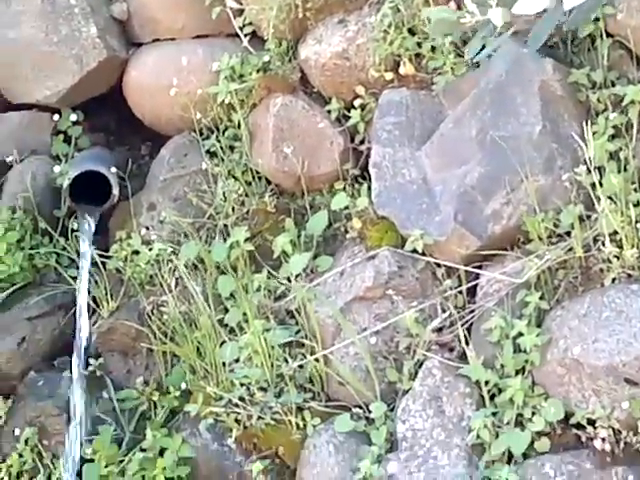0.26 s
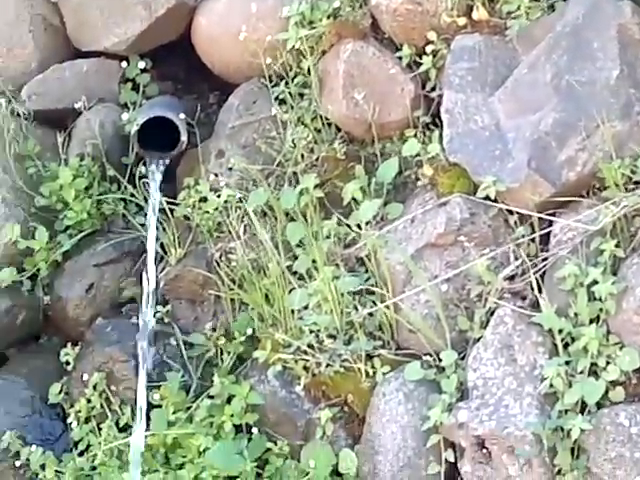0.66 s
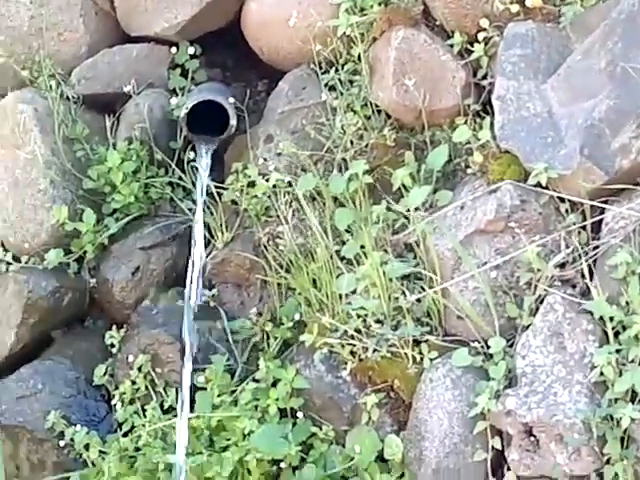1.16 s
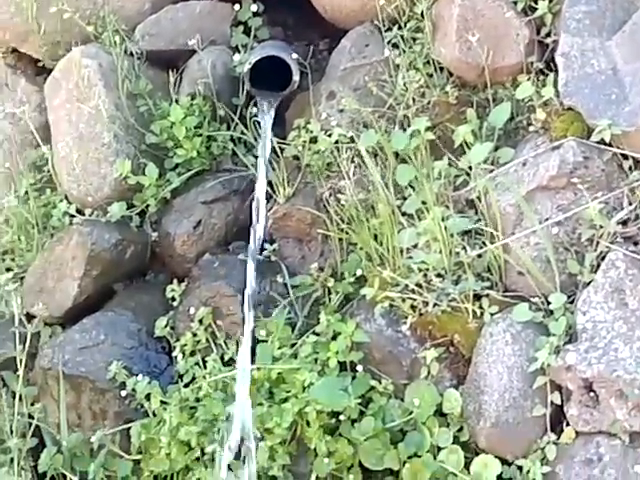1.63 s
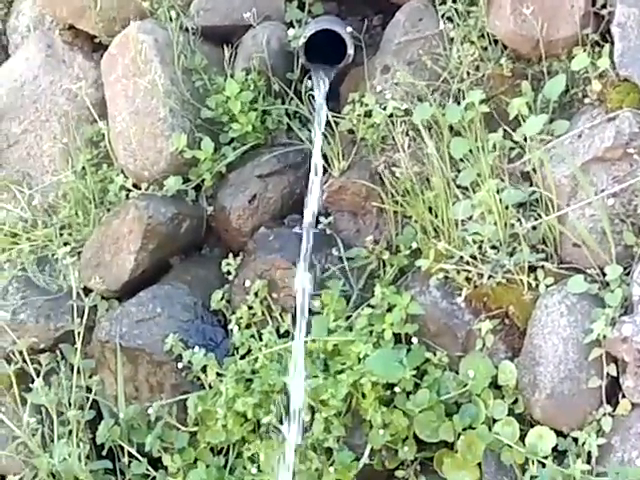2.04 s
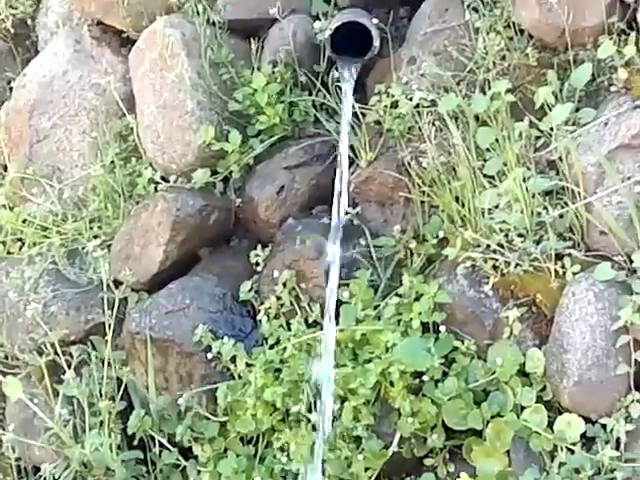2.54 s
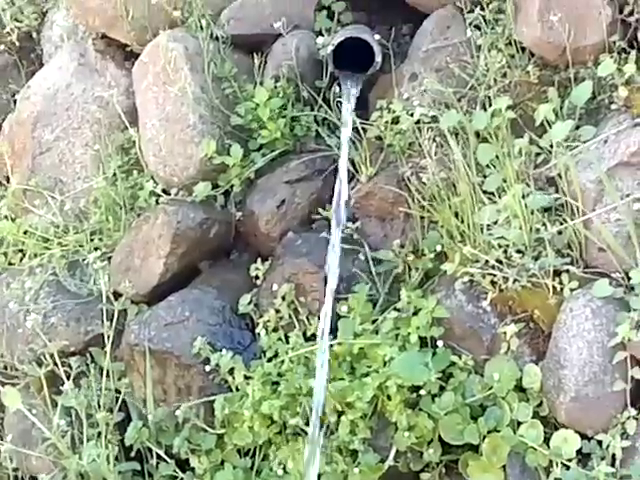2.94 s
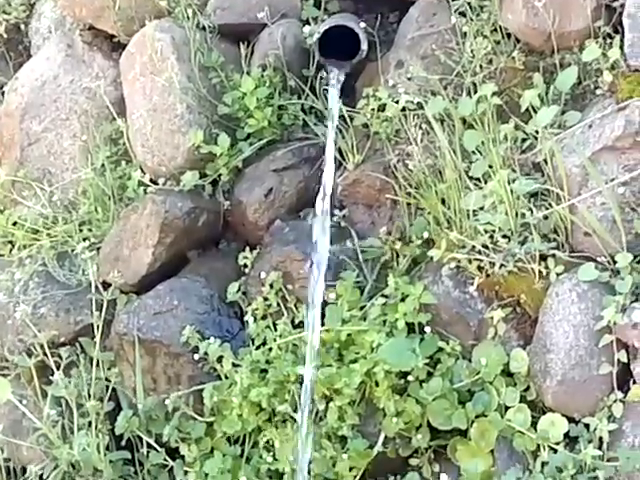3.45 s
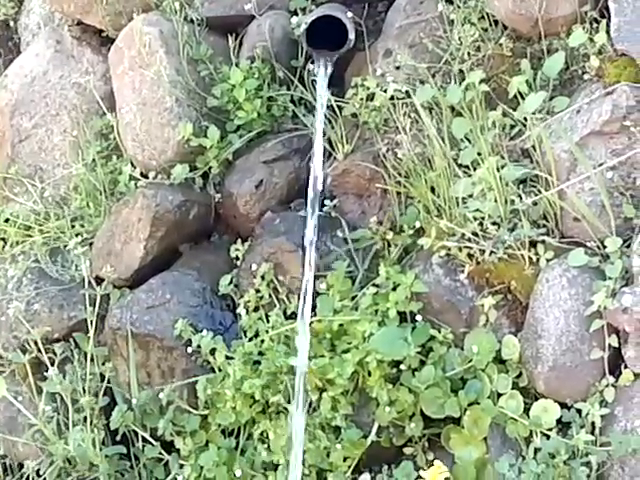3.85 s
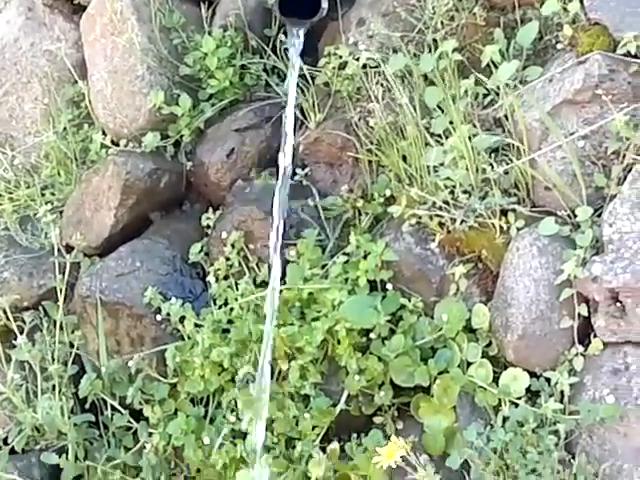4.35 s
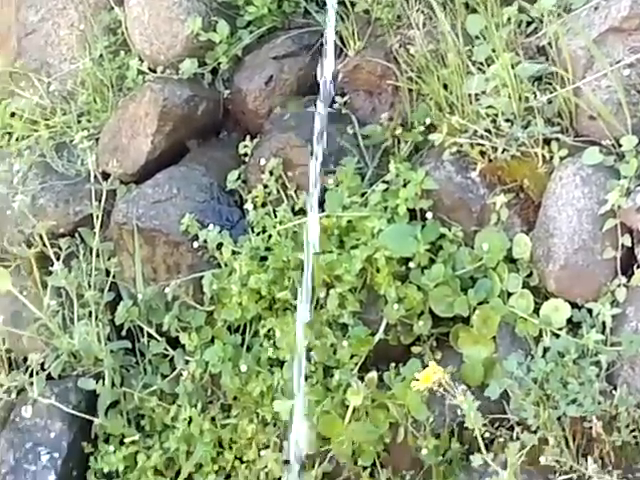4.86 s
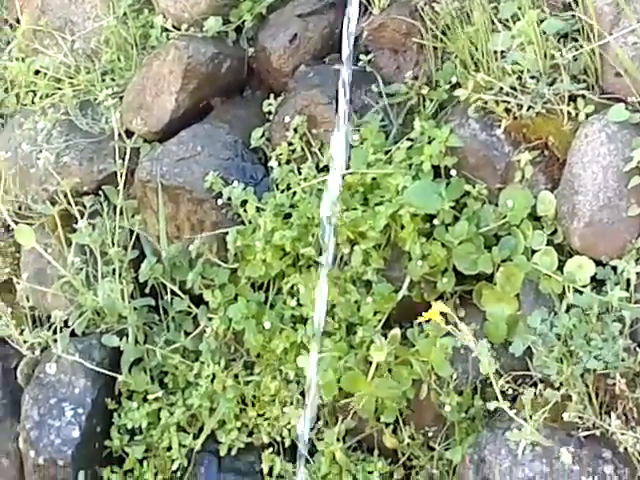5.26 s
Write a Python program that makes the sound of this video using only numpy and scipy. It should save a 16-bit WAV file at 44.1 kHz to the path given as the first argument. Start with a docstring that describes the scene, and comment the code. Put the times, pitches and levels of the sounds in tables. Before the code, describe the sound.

Water pours from a pipe and splashes unevenly on stones, with bubbling, small plops and low wind buffeting the microphone.

```python
"""Spring water on wet rocks

A thin stream falls from a pipe in a stone wall and lands in gushes of uneven slugs (lumps of water).
They burst into fine spray and beat in bubbles that gurgle in a hollow between the stones. Big drops
slap, trapped air plops and stray drops tick. Wind buffets the microphone, hardest near the end."""
import sys
import numpy as np
from scipy import signal
from scipy.io import wavfile
from scipy.ndimage import uniform_filter1d

SR = 44100
rng = np.random.default_rng(int(sys.argv[2]) if len(sys.argv) > 2 else 0)


def generate_wav(signal):
    """Clip the signal to [-1, 1] and save it as 16-bit WAV at the path in sys.argv[1]."""
    frames = np.transpose(np.atleast_2d(signal))
    scaled = np.clip(frames, -1, 1) * 32767
    pcm = np.round(scaled).astype(np.int16)
    wavfile.write(sys.argv[1], SR, pcm)


N = 242539

# The gushes of the stream. Each row: start in seconds, length in seconds, relative spray level in dB,
# relative gurgle level in dB, pitch in Hz that the loudest bubbles stray around at mid-gush.
GUSHES = [(-0.012, 0.05, -35, -40.5, 1820), (0.122, 0.021, -32.5, -46, 2140),
          (0.208, 0.13, -33.5, -37.5, 1730), (0.35, 0.081, -37.5, -49, 1900),
          (0.47, 0.11, -33.5, -43, 1450), (0.602, 0.03, -33, -45, 1830), (0.691, 0.15, -38, -41, 1690),
          (0.825, 0.043, -34, -36, 1450), (0.935, 0.17, -34.0, -41, 2250), (1.118, 0.076, -40, -41.5, 2000),
          (1.231, 0.14, -33, -39, 1620), (1.385, 0.14, -33, -42.5, 1790), (1.535, 0.12, -34, -48, 1900),
          (1.725, 0.26, -36.5, -40.9, 2140), (1.999, 0.14, -34.5, -35, 1770), (2.18, 0.042, -35, -41, 2530),
          (2.28, 0.26, -34, -38.6, 1220), (2.57, 0.1, -29, -40, 1670), (2.742, 0.057, -34.5, -55, 2100),
          (2.844, 0.081, -33, -37, 1790), (2.948, 0.21, -33.0, -40.5, 1720), (3.2, 0.12, -31, -45, 1800),
          (3.33, 0.06, -35.5, -37.5, 1690), (3.419, 0.136, -33, -36.5, 1660),
          (3.568, 0.18, -43.5, -43, 1310), (3.734, 0.048, -34, -36, 1650), (3.822, 0.029, -35, -40, 1730),
          (3.915, 0.21, -33.8, -40.5, 2540), (4.164, 0.15, -35.5, -37.5, 1560),
          (4.316, 0.083, -36.9, -43.5, 2230), (4.432, 0.128, -36.5, -45.2, 1500),
          (4.655, 0.18, -37.5, -38.5, 1260), (4.913, 0.13, -39, -42, 1740),
          (5.182, 0.07, -39.5, -42.5, 1510), (5.285, 0.17, -53, -65, 2000),
          (5.437, 0.025, -37, -40.5, 1430)]
def flow(part):
    """How loud the "spray" or the "gurgle" is over time: gushes on top of a steady trickle."""
    column, trickle_db = {"spray": (2, -36.5), "gurgle": (3, -46.5)}[part]
    return np.hypot(swells(GUSHES, column, attack_s=0.0027, release_s=0.0048), gain_of(trickle_db))


def pocket_pitch(sink_octaves=0.37, stray_octaves=0.23):
    """Each gush digs a deepening pocket in the puddle, so its bubbles start high and sink in pitch."""
    t, pitch = np.arange(N) / SR, np.full(N, float(GUSHES[0][4]))
    for start, length, _, _, hz in GUSHES:
        after = t >= start
        dug = np.minimum((t[after] - start) / length, 1)
        pitch[after] = hz * 2 ** (sink_octaves * (.5 - dug))
    return pitch * 2 ** (stray_octaves * wander(top_hz=18))


def slugs(steady=0.81):
    """How hard the water lands over time: each slug hits at once, then spreads out."""
    power = dying(impacts(per_s=110, spread_db=4.5) ** 2, life_s=0.018)
    return np.sqrt(power / power.mean() + steady)


# The bright tone of droplets on rock. Each row: frequency in Hz, relative level in dB.
SPRAY_TONE = [(150, -3), (300, -10), (420, -4), (700, -8.5), (1200, -1), (2400, 0), (3400, -3.5),
              (4000, -8.5), (4450, -1), (4850, -2), (5500, 2.5), (6500, 0.5), (10000, -1), (11500, 2),
              (13700, 2.5), (14500, -8.5), (16000, -4.5)]
def spray(landing):
    """Every slug bursts into tiny ticking droplets; each patch of rock has its own tone."""
    ticks = evened(impacts(per_s=7000, spread_db=0.5) * rng.choice([-1, 1], N)) * landing
    patches = np.zeros(N)
    for hz in np.geomspace(2500, 14000, num=9):
        bursts = noise_bursts(per_s=57, spread_db=3.5, life_s=0.0014)
        patches += evened(resonate(bursts, hz, 0.33 * hz)) * np.sqrt(hz)
    splash = coloured(ticks + evened(patches), SPRAY_TONE)
    return gain_of(-0.12) * steadied(splash, size=2000) * flow("spray")


# The tone of the bubbling puddle. Each row: frequency in Hz, relative level in dB.
GURGLE_TONE = [(200, 5), (430, 4.5), (700, -3), (1000, -6.5), (1700, -1), (2800, -2), (4000, 1.5),
               (8000, -22.5)]
def gurgle(landing, focus_db=9, focus_octaves=0.44):
    """Slugs beat short-lived bubbles into the puddle, loudest near the pitch of the pocket."""
    froth = np.zeros(N)
    pocket_hz = pocket_pitch()
    for hz in np.geomspace(340, 4200, num=48):
        ring = bubble(hz, cycles=7.3 * rng.uniform(1.0, 1.75), rise=0.022)
        births = impacts(per_s=32 * hz / 1500, spread_db=3.0) * rng.choice([-1, 1], N) * landing
        at = np.flatnonzero(births)
        nearness = np.exp(-(np.log2(hz / pocket_hz[at]) / focus_octaves) ** 2)
        births[at] *= gain_of(focus_db * nearness)
        froth += signal.oaconvolve(births, ring / np.linalg.norm(ring))[:N] * np.sqrt(hz)
    bubbling = in_hollow(coloured(froth, GURGLE_TONE), ring_db=1.5)
    return gain_of(-0.08) * steadied(bubbling, size=2000) * flow("gurgle")


def bubble(hz, cycles, rise):
    """Trapped air rings, rising in pitch as it nears the surface; more cycles make it ring longer."""
    age = np.arange(0, 2 * np.pi, hz / (cycles * SR))
    return np.exp(-age) * np.sin(2 * np.pi * cycles * (age + rise * age ** 2 / 2))


# The notes at which the hollow rings. Each row: pitch in Hz, width in Hz, relative level in dB.
HOLLOW_NOTES = [(1102, 113, 16), (1720, 200, 5), (2660, 100, 2.5)]
def in_hollow(x, ring_db):
    """The gap between the stones rings along with the sound inside it."""
    ringing = sum(gain_of(db) * resonate(x, hz, width) for hz, width, db in HOLLOW_NOTES)
    return x + gain_of(ring_db) * ringing


# Big drops on bare rock. Each row: start in seconds, peak level in dB, centre frequency in Hz.
ROCK_SLAPS = [(0.542, -13, 11000), (0.6836, -17, 9410), (1.282, -4.5, 13600), (1.3478, -18.5, 5340),
              (1.7464, -11, 5400), (1.774, -17.5, 5900), (2.0033, -11, 11400), (2.1964, -18, 3780),
              (2.2173, -17, 12900), (2.636, -21, 11100), (2.7362, -24, 13800), (2.9584, -14.5, 5200),
              (3.2014, -15, 12600), (3.3004, -20, 11200), (3.4231, -20, 13900), (4.1814, -17, 5900),
              (4.817, -14, 11600), (5.434, -16, 11800)]
def slaps():
    """A big drop cracks on the rock and leaves a short hiss of spray."""
    out, t = np.zeros(N), np.arange(1500) / SR
    fade = np.exp(-t / 0.0015) + gain_of(-13) * np.exp(-t / .006)  # quick crack, slower hiss
    tick = gain_of(3) * (t == 0)
    for start, db, hz in ROCK_SLAPS:
        burst = rng.standard_normal(len(t)) * fade + tick
        crack = resonate_twice(burst, hz, hz)
        add(out, start, gain_of(db) * crack / abs(crack).max())
    return out


# Air trapped in the puddle. Each row: start in seconds, relative level in dB, starting pitch in Hz.
AIR_PLOPS = [(0.243, -29, 1146), (0.263, -24, 1700), (0.304, -23, 1750), (0.5, -22, 1550),
             (0.533, -29, 1270), (0.617, -26, 1800), (0.682, -25, 2150), (0.837, -26.5, 1370),
             (1.019, -15.5, 2540), (1.27, -22, 1690), (1.427, -13.5, 1940), (1.745, -18, 2620),
             (2.034, -15.5, 2940), (2.197, -26, 2750), (2.219, -26, 2120), (2.288, -26.5, 1065),
             (2.364, -25.5, 878), (2.623, -14.5, 1540), (2.641, -22, 1310), (2.6597, -14, 2850),
             (2.97, -20.5, 2680), (4.061, -16, 2560), (4.106, -9, 2920), (4.18, -21, 3100),
             (4.276, -29, 1090), (5.444, -24, 1750), (5.464, -27.5, 1176)]
def plops():
    """A big bubble knocks with a tick and a small splat; two fainter ones ring just after it."""
    out, t = np.zeros(N), np.arange(1500) / SR
    for start, db, hz in AIR_PLOPS:
        add(out, start, gain_of(db) * bubble(hz, cycles=5.9, rise=0.0031))
        tick = rng.standard_normal(len(t)) * np.exp(-t / 0.00055)
        add(out, start, gain_of(db - 8) * tick)
        splat = evened(resonate_twice(rng.standard_normal(len(t)), hz, hz)) * np.exp(-t / 0.007)
        add(out, start, gain_of(db - 16) * splat)
        for delay, detune in rng.random((2, 2)):
            follower = bubble(hz * (.7 + .5 * detune), cycles=7, rise=.025)
            add(out, start + .012 * delay, gain_of(db - 13) * follower)
    return gain_of(-5.0) * in_hollow(out, ring_db=-7)


def thinning(dip_db=-1, dip_s=0.01):
    """The stream thins before a big drop pinches off, so its level dips ahead of each slap and plop."""
    t, thin = np.arange(N) / SR, np.zeros(N)
    for start, _, _ in ROCK_SLAPS + AIR_PLOPS:
        thin = np.maximum(thin, np.exp(-((t - start + dip_s / 2) / dip_s) ** 2))
    return gain_of(dip_db * thin)


def stray_drops():
    """Drops flung from the gushes tick on the stones around, each stone with its own tone."""
    ticks = np.zeros(N)
    for hz in np.geomspace(3200, 12500, num=6):
        bursts = noise_bursts(per_s=9, spread_db=2.5, life_s=0.0015)
        ticks += evened(resonate_twice(bursts, hz, 0.78 * hz)) * np.sqrt(hz)
    return gain_of(-7) * evened(coloured(ticks, SPRAY_TONE)) * flow("spray")


def stone_echo(x, life_s=0.0037, size=3000):
    """Stones close by scatter a short, faint echo."""
    t = np.arange(size) / SR
    echoes = rng.standard_normal(size) * (rng.random(size) < .12) * t * np.exp(-t / (life_s / 2))
    return x + gain_of(-17) * signal.oaconvolve(x, echoes / np.linalg.norm(echoes))[:N]


# The tones of smooth air, big eddies (swirls of air) and small eddies.
# Each row: frequency in Hz, relative level in dB.
SMOOTH_AIR_TONE = [(8, -11.5), (25, -2), (55, -3.5), (100, -12.5), (160, -21), (300, -37.5), (2000, -64)]
RUMBLE_TONE = [(8, -27.5), (25, -7.5), (45, -1), (70, 1.5), (125, -8), (190, -15.5), (350, -27),
               (700, -68.5), (2000, -79)]
FLUTTER_TONE = [(60, -39.5), (170, 0), (280, -2.5), (480, -8.5), (900, -22), (1600, -40), (4000, -55)]
# The gusts of wind. Each row: start in seconds, length in seconds, relative rumble level in dB,
# relative flutter level in dB.
GUSTS = [(-0.015, 0.017, -13.5, -23), (0.07, 0.034, -26.5, -36.5), (0.18, 0.038, -14, -27),
         (0.25, 0.15, -18.5, -41), (0.42, 0.18, -28, -67), (0.62, 0.21, -25, -44.5),
         (0.73, 0.15, -31.5, -49), (0.935, 0.18, -35.1, -45), (1.21, 0.07, -36, -50),
         (1.3, 0.23, -25.5, -41.5), (1.51, 0.12, -21.5, -41.8), (1.695, 0.067, -12, -29.5),
         (1.8, 0.12, -25, -48), (1.93, 0.08, -33.9, -56.7), (2.05, 0.92, -48, -52.5),
         (2.275, 0.028, -33, -44.5), (2.65, 0.049, -36, -61), (3.005, 0.16, -31.5, -50),
         (3.32, 0.31, -36.5, -49), (3.458, 0.089, -17.5, -38.5), (3.592, 0.09, -23.5, -39),
         (3.943, 0.21, -20.5, -31.5), (4.14, 0.16, -17, -32), (4.34, 0.34, -18.6, -32),
         (4.57, 0.25, -13.5, -29.5), (4.845, 0.029, -7, -25.0), (4.925, 0.095, -22.5, -53),
         (5.06, 0.076, -19, -36.5), (5.19, 0.085, -19.6, -38), (5.31, 0.044, -18.5, -36.5),
         (5.385, 0.08, -21.5, -38.5)]
def wind(break_db=-29, rumble_lump_db=2.5, flutter_lump_db=4):
    """Big eddies rock the microphone's thin membrane; small ones flutter on their crests."""
    lumps = wander(top_hz=18)  # a gust arrives in lumps
    force = swells(GUSTS, column=2, attack_s=0.014, release_s=0.039) * gain_of(rumble_lump_db * lumps)
    churn = swells(GUSTS, column=3, attack_s=0.015, release_s=0.017) * gain_of(flutter_lump_db * lumps)
    broken = force / (force + gain_of(break_db))  # light air is smooth; strong gusts break into eddies
    eddy_power = dying(impacts(per_s=90, spread_db=4.0) ** 2, life_s=0.0033) + 0.49
    eddies = rng.standard_normal(N) * np.sqrt(eddy_power)
    smooth = evened(coloured(eddies, SMOOTH_AIR_TONE))
    rough = evened(coloured(eddies, RUMBLE_TONE))
    rumble = steadied((1 - broken) * smooth + broken * rough, size=1900)
    crests = 1.4 + abs(rumble) ** 1.31
    flutter = steadied(coloured(rng.standard_normal(N) * crests, FLUTTER_TONE), size=1900)
    return gain_of(-1.6) * force * rumble + gain_of(2.0) * broken * churn * flutter


# The tearing noise of a sharp eddy. Each row: frequency in Hz, relative level in dB.
TEAR_TONE = [(100, 29), (300, -2.5), (700, -2), (1200, -3.5), (2000, -16), (5000, -46)]
# Single eddies that strike the microphone. Each row: start in seconds, relative level in dB.
EDDY_HITS = [(0.204, -33), (0.372, -27.5), (1.713, -37), (3.549, -22.5), (4.116, -21.5), (4.237, -20),
             (4.386, -25.5), (4.487, -18), (4.597, -14), (4.634, -13), (4.715, -25), (4.776, -20),
             (4.799, -19), (4.866, -15), (4.878, -13.5), (5.223, -21.5)]
def buffets():
    """A sharp eddy pushes and pulls on the membrane, with a brief tearing noise."""
    out, t = np.zeros(N), np.arange(3000) / SR
    age = t / 0.002
    push = age * (2 - age) * np.exp(-age)
    for start, db in EDDY_HITS:
        tear = evened(coloured(rng.standard_normal(len(t)), TEAR_TONE)) * np.exp(-t / 0.015)
        thump = rng.choice([-1, 1]) * push / push.max()
        add(out, start, gain_of(db) * (thump + gain_of(-15) * tear))
    return gain_of(12.5) * out


def breeze():
    """Between the gusts the air never quite rests."""
    return gain_of(-56) * evened(coloured(rng.standard_normal(N), SMOOTH_AIR_TONE))


def gain_of(db):
    """Turns decibels into a number to multiply a sound by."""
    return 10 ** (np.asarray(db) / 20)


def evened(x):
    """Scales a sound to an average (rms) level of 1."""
    return x / np.sqrt(np.mean(x ** 2) + 1e-20)


def steadied(x, size):
    """Holds the level near 1 over stretches of about size samples, keeping the faster detail."""
    return x / np.sqrt(abs(uniform_filter1d(uniform_filter1d(x ** 2, size), size)) + 1e-20)


def add(mix, start_s, sound):
    """Mixes a sound in at the given time."""
    part = mix[max(round(start_s * SR), 0):][:len(sound)]
    part += sound[:len(part)]


def coloured(x, tone, size=8192):
    """Shapes a sound with a tone table. Nothing rings ahead of a click, so its front stays sharp."""
    hz, db = np.transpose(tone)
    log_hz = np.log(abs(np.fft.fftfreq(size, 1 / SR)) + 1)
    log_gain = np.log(gain_of(np.interp(log_hz, np.log(hz), db)))
    taps = np.fft.ifft(np.exp(np.conj(signal.hilbert(log_gain)))).real[:size // 2]
    return signal.oaconvolve(x, taps)[:len(x)]


def resonate(x, hz, width_hz):
    """Makes a sound ring around one pitch; a narrower width rings longer."""
    decay = np.exp(-np.pi * width_hz / SR)
    return 2 * signal.lfilter([1 - decay], [1, -decay * np.exp(2j * np.pi * hz / SR)], x).real


def resonate_twice(x, hz, width_hz):
    """Two passes let less through far from the pitch."""
    return resonate(resonate(x, hz, width_hz), hz, width_hz)


def impacts(per_s, spread_db):
    """Randomly timed clicks, many small and a few large."""
    size = gain_of(spread_db * np.minimum(rng.exponential(1, N), 4))
    return size * (rng.random(N) < per_s / SR)


def dying(x, life_s):
    """Gives every click a tail that fades to about a third in life_s seconds."""
    return signal.lfilter([1], [1, -np.exp(-1 / (life_s * SR))], x)


def noise_bursts(per_s, spread_db, life_s):
    """Randomly timed puffs of hiss that start sharply and fade."""
    return np.sqrt(dying(impacts(per_s, spread_db) ** 2, life_s)) * rng.standard_normal(N)


def swells(table, column, attack_s, release_s):
    """Level over time: each row rises to the dB in the chosen column, holds, then dies away."""
    t, power = np.arange(N) / SR, np.zeros(N)
    for row in table:
        age = t - row[0]
        rise = np.clip(age / attack_s, 0, 1) ** 2
        fall = np.exp(-np.clip((age - row[1]) / release_s, 0, 20))
        power += (gain_of(row[column]) * rise * fall) ** 2
    return np.sqrt(power)


def wander(top_hz):
    """A random swaying of typical size 1, at rates from a quarter of top_hz up to top_hz."""
    t = np.arange(0, N / SR + .01, .002)
    rates = np.geomspace(top_hz / 4, top_hz, num=24)
    sway = sum(np.sin(2 * np.pi * (hz * t + rng.random())) for hz in rates)
    return np.interp(np.arange(N) / SR, t, evened(sway))


def scene(spray_swing_db=0.48, gurgle_swing_db=1.33, swing_hz=25.42):
    """Water, whose level swings as it arrives unevenly, and wind, mixed into one channel."""
    landing = slugs()
    on_rock = spray(landing) * gain_of(spray_swing_db * wander(swing_hz))
    in_puddle = gurgle(landing) * gain_of(gurgle_swing_db * wander(swing_hz))
    water = (on_rock + in_puddle) * thinning() + stray_drops() + slaps() + plops()
    return (stone_echo(water) + breeze() + wind() + buffets())[None]


def record(dry, ceiling=.78, top_hz=16000):
    """The strongest gusts overload the microphone softly, and the highest treble is cut off."""
    softened = dry / (1 + (dry / ceiling) ** 4) ** (1 / 4)
    treble_cut = signal.firwin(511, top_hz, window=("kaiser", 9), fs=SR)
    return signal.oaconvolve(softened, treble_cut[None], "same")


dry = scene()
out = record(dry)
generate_wav(out)
```